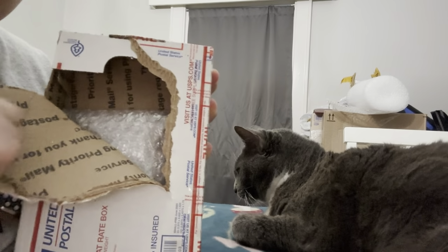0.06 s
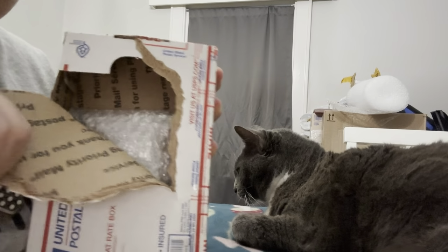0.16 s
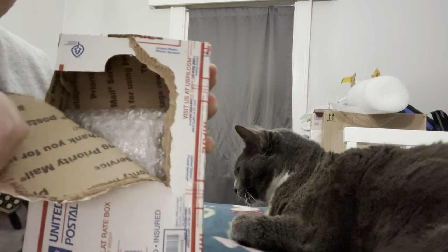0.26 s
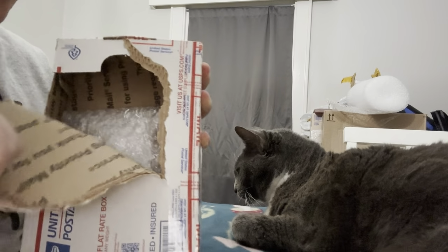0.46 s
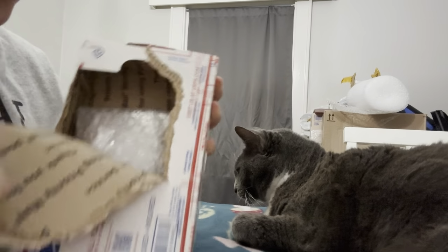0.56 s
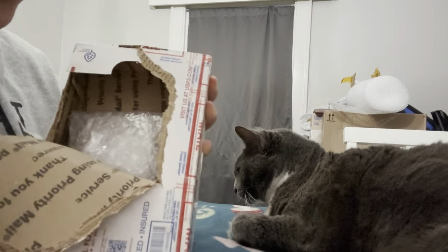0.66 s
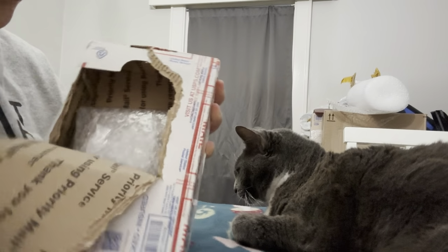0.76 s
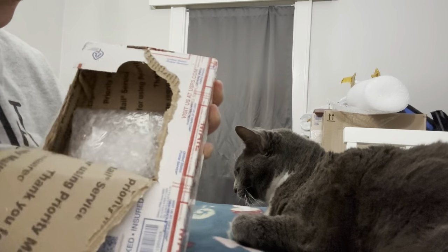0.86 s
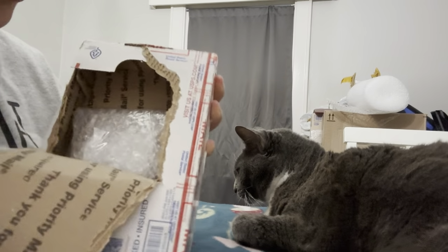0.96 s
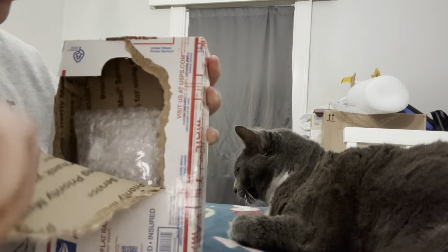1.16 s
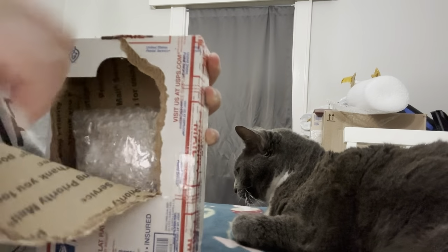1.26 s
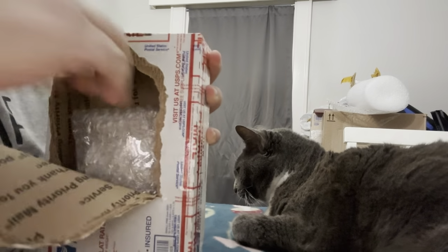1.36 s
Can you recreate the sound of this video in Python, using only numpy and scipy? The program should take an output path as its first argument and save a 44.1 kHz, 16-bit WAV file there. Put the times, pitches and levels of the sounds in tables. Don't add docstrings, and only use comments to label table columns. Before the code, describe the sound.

Cardboard box ripped open by hand in two rough, crackling pulls, then a sharp flap snap

```python
import sys
import numpy as np
from scipy import signal
from scipy.fft import rfft, irfft, next_fast_len
from scipy.io import wavfile
from scipy.ndimage import uniform_filter1d, map_coordinates

SR = 44100
rng = np.random.default_rng(int(sys.argv[2]) if len(sys.argv) > 2 else 0)


def volts_from_decibels(level):
    exponent = np.asarray(level, float) / 20
    return 10 ** exponent


def store_wav(level_fs):
    pcm = np.round(np.clip(np.atleast_2d(level_fs), -1, 1) * 32767)
    wavfile.write(sys.argv[1], SR, pcm.T.astype(np.int16))


N = 61739
TOP_HZ = 15900

# f/Hz, level per Hz/dB
AIR_SPECTRUM = [(30, -6.5), (136, -2), (211, -5), (296, -3), (497, -6.5), (1100, -39.5), (1900, -17.5),
                (2500, -32.5), (15000, -47.5)]
# f/Hz, T60/s
ROOM_DECAY = [(150, 0.25), (1000, 0.13), (12000, 0.063)]
# f/Hz, phase/rad
PORT_LEAD = [(0, 0), (1460, .2), (2500, 1.1), (3500, .6), (4310, 3.8), (5250, 6.5), (6300, 8.2),
             (7200, 9.45), (8200, 10.9), (9600, 12.5), (12300, 12.65), (13500, 14.2), (15000, 15.6),
             (16400, 15.8)]
# f/Hz, share/1
PORT_COHERENCE = [(60, .96), (200, .93), (700, .5), (1500, .8), (4000, .45), (7200, .7), (9000, .9),
                  (10000, .98), (12000, .96)]
# f/Hz, level/dB
PORT_TILT = [(60, -1), (500, 1), (900, 0), (1500, -2.7), (5000, -3), (9000, 0)]

# f/Hz, level per Hz/dB
HANDLING_SPECTRUM = [(30, -48), (70, 0.5), (150, 6), (260, -7), (400, -42)]
# t/s, duration/s, f/Hz, level/dB, relative pitch gain/1
CREAKS = [
    (.12, .042, 1260, -31, .08),
    (.15, .048, 690, -29, .06),
    (.178, .03, 1290, -35, .04),
    (.922, .06, 415, -35, .2),
    (.965, .045, 470, -38, -.15),
    (.995, .055, 620, -43, .3),
    (1.035, .05, 400, -41, -.25),
]
# t/s, level/dB, f/Hz, T60/s
THUMPS = [
    (0.357, -22.5, 140.5, 0.097),
    (0.501, -19.5, 82.4, 0.058),
    (0.531, -27, 139, 0.11),
    (0.71, -33, 118, 0.091),
    (1.026, -32.5, 82, 0.16),
]
# t/s, level/dB, f/Hz, T60/s
SNAP_MODES = [
    (1.1572, -13, 1890, 0.0093),
    (1.1604, -15, 1720, 0.013),
    (1.161, -19, 1117, 0.034),
    (1.162, -11, 922, 0.014),
    (1.161, -13.5, 4200, 0.0064),
    (1.164, -29, 393, 0.074),
    (1.164, -16.5, 146, 0.022),
]
# t/s, level/dB
SNAP_CRACKS = [
    (1.1572, -34),
    (1.1608, -24),
]

# t/s, level/dB
TICKS = [
    (.0384, -44),
    (.8004, -35),
    (.8125, -22),
    (.8254, -38),
    (.845, -33),
    (.8604, -41),
    (1.0271, -44),
]
# f/Hz, level per Hz/dB
TICK_SPECTRUM = [(1500, -4.5), (3500, -14.5), (9000, -12), (14000, -3.5), (16800, -1.5)]
# t/s, level/dB
ZIPS = [(0.162, -61), (0.174, -49), (0.189, -42), (0.198, -41.5), (0.201, -43), (.212, -41), (.222, -35),
        (.2285, -32), (.238, -37), (0.2445, -32.5), (0.2524, -29.5), (.5665, -48), (0.5765, -39.5),
        (.586, -46), (.602, -40), (0.606, -23.5), (0.62, -33), (0.625, -25.5), (.639, -28.5)]
# f/Hz, level per Hz/dB
ZIP_SPECTRUM = [(3000, 2), (6500, -20), (8500, 2), (12500, 0.5), (15500, -3)]

# f/Hz, bandwidth/Hz, level/dB
PANEL_MODES = [(305.3, 21, -2.5), (426, 140, 0), (805, 302, 0.5), (1420, 460, -2), (1823, 294, 0),
               (2115, 264, -4), (2574, 260, -4.5)]
# f/Hz, level per Hz/dB
FIBRE_SPECTRUM = [(1200, -8), (2300, -4), (4000, 1.5), (6000, -4), (9500, -4.5), (12000, -4.5),
                  (14200, -3.5), (15900, -7.5)]
# t/s, force level/dB, tearing over force/dB
GRIP = [
    (0, -52.5, -0.5),
    (0.04, -41.5, -4.5),
    (.09, -41, -4),
    (0.112, -34.5, -12),
    (0.156, -32.5, -17),
]
# t/s, force level/dB, tearing over force/dB
FIRST_PULL = [
    (0.189, -35.5, -7),
    (.26, -31, -6.5),
    (.34, -33.5, -5.5),
    (.4, -29, -5),
    (0.436, -27.5, -6),
    (0.444, -24, -2),
    (.5, -21.5, -3),
    (0.528, -26.5, 2.5),
    (0.561, -39, -5),
]
# t/s, force level/dB, tearing over force/dB
SECOND_PULL = [
    (.595, -37.5, -4.5),
    (0.608, -43.5, 2.5),
    (.665, -26, -2),
    (.7, -31.5, 2),
    (0.759, -27, -5),
    (0.799, -42.5, 1),
    (0.876, -58, -1.5),
]
# t/s, force level/dB, tearing over force/dB
RUB = [
    (.92, -61.5, 2.5),
    (.95, -52.5, -12),
    (1.008, -46, -13),
    (1.042, -42, -4),
    (1.131, -51.5, -6.5),
    (1.19, -56.5, 0),
    (1.24, -54.5, -11),
    (1.31, -59.5, -14),
    (1.4, -58, -39),
]
# t/s, peak level/dB, crack over peak/dB
JERKS = [(.242, -20, -8), (.253, -11, -28), (0.278, -19.5, -7), (0.312, -14, -12.5), (.352, -10, -8.5),
         (0.393, -17.5, -3.5), (0.403, -20, -8), (0.44, -13, -8), (0.451, -13.5, -9), (0.479, -9, 0),
         (0.493, -13, -3.5), (0.498, -13, -10), (0.505, -3.5, -14), (0.518, -6.5, -2.5), (0.601, -20.5, -5),
         (0.627, -19, -6.5), (0.653, -16.5, -4), (0.705, -10.5, -2), (.716, -16.5, -6), (0.738, -15, 0.5),
         (.756, -11, -15), (.774, -17, -6)]
# peak t/s, level/dB, f/Hz
PANEL_RINGS = [(.233, -28, 775), (.2345, -33, 424), (.244, -25, 782), (.2454, -25.5, 412),
               (.254, -24.5, 678), (.2684, -22.5, 910), (.2724, -24, 1540), (.2744, -28, 358),
               (.28, -25, 1203), (.281, -21, 1690), (.3173, -24.5, 890), (.3552, -18, 1668),
               (.3567, -17.5, 990), (.3622, -22.5, 466), (.3702, -25.5, 870), (.388, -19.5, 857),
               (.3966, -18.5, 1023), (.3966, -20, 1680), (.406, -20.5, 973), (.4235, -27.5, 1006),
               (.442, -12, 963), (.453, -20, 896), (.455, -19, 1975), (.4644, -12, 838),
               (.4664, -23.5, 504), (.474, -19.5, 760), (.48, -9, 2000), (.4804, -13.5, 855),
               (.4894, -13.5, 438), (.4924, -12.5, 1790), (.4944, -16, 906), (.495, -20, 446),
               (.5004, -16.5, 1684), (.5078, -13.5, 1663), (.5108, -15, 430), (.5123, -21.5, 865),
               (.5198, -16, 1830), (.5218, -14.5, 450),
               (.6056, -35.5, 850), (0.6084, -26, 1470), (0.6197, -28, 1400), (0.629, -22.5, 1424),
                (.657, -22.5, 813), (0.659, -19.5, 1421), (.6635, -24.5, 525), (0.6819, -24.5, 530),
                (.6844, -24.5, 1236), (0.6982, -24.5, 1360), (0.7089, -17.5, 858), (0.712, -16, 418),
                (0.716, -17.5, 1263), (.72, -26.5, 983), (.7413, -37.5, 577), (0.7443, -36, 1330),
                (0.745, -23.5, 996), (.7508, -24.5, 954), (.7508, -21, 613), (0.7591, -21, 1394),
                (0.7748, -26.5, 1670), (0.7757, -23.5, 1116), (0.7829, -25.5, 987), (0.816, -34, 980)]


def unit(x):
    return x / np.sqrt(np.mean(x ** 2) + 1e-20)


def noise():
    return rng.standard_normal(N)


def along(points, hz):
    f, value = np.transpose(points)
    return np.interp(np.log(hz + 1), np.log(f + 1), value)


def wobble(rate):
    return map_coordinates(rng.standard_normal(size=1024), [np.arange(N) * rate / SR])


def filtered(x, response):
    m = next_fast_len(N + SR // 4)
    hz = np.fft.rfftfreq(m, 1 / SR)
    return irfft(rfft(x, m) * response(hz), m)[..., :N]


def coloured(x, spectrum, top_hz=SR):
    return filtered(x, lambda hz: volts_from_decibels(along(spectrum, hz)) * (hz < top_hz))


def patchy(x, depth_db):
    z = signal.stft(x, nperseg=256)[2]
    field = uniform_filter1d(rng.standard_normal(z.shape), size=3, axis=0)
    field = uniform_filter1d(field, size=8, axis=1)
    return signal.istft(z * volts_from_decibels(depth_db * unit(field)), nperseg=256)[1][:N]


def event_time():
    return np.arange(SR // 5) / SR


def decay_db(t, hold_s, t60):
    return -60 * np.maximum(t - hold_s, 0) / t60


def add(track, s, sound):
    k = round(s * SR)
    track[k:k + len(sound)] += sound[:len(track) - k]


def air():
    hiss = unit(patchy(coloured(noise(), AIR_SPECTRUM, TOP_HZ), depth_db=1.5))
    return volts_from_decibels(-46 + wobble(20.5)) * hiss


def room(x):
    hz, t, z = signal.stft(rng.standard_normal(SR // 4), SR, nperseg=256)
    fading = volts_from_decibels(-60 * t / along(ROOM_DECAY, hz)[:, None])
    tail = signal.istft(z * fading, SR, nperseg=256)[1]
    delayed = np.pad(x, (150, 0))
    return signal.fftconvolve(delayed, tail / np.linalg.norm(tail))[:N]


def scattered(x):
    z = signal.stft(x, nperseg=128)[2]
    random_phase = np.exp(2j * np.pi * rng.random(z.shape))
    return 1.3 * signal.istft(z * random_phase, nperseg=128)[1][:N]


def ports(x, other):
    def shares(hz):
        angle = np.arccos(np.clip(along(PORT_COHERENCE, hz), -1, 1)) / 2
        return np.array([np.cos(angle), np.sin(angle)])

    f, lead = np.transpose(PORT_LEAD)
    sign = np.array([[.5], [-.5]])

    def difference(hz):
        return volts_from_decibels(sign * along(PORT_TILT, hz)) * np.exp(1j * sign * np.interp(hz, f, lead))

    mid, side = filtered(np.array([x, other]), shares)
    return filtered(np.array([mid + side, mid - side]), difference)


def pull_levels():
    s, force_db, over_db = np.transpose(GRIP + FIRST_PULL + SECOND_PULL + RUB)
    t = np.arange(N) / SR
    return np.interp(t, s, force_db), np.interp(t, s, force_db + over_db)


def handling(force_db):
    shift = unit(coloured(noise(), HANDLING_SPECTRUM))
    return volts_from_decibels(-47.5 + 0.34 * (force_db + 30) + wobble(11.0)) * shift


def creaks():
    out = np.zeros(N)
    for s, length, hz, db, rise in CREAKS:
        n = round(length * SR)
        rate = hz * (1 + rise * np.arange(n) / n)
        scatter = .045 * rng.standard_normal(n)
        phase = np.cumsum(2 * np.pi * rate / SR + scatter)
        tone = np.sin(phase) + volts_from_decibels(-18) * np.sin(2 * phase) + volts_from_decibels(-12) * np.sin(3 * phase)
        roughness = 1 + .4 * np.tanh(wobble(150)[:n])
        add(out, s, volts_from_decibels(db) * np.hanning(n) ** .4 * roughness * tone)
    dull_hz = 1600
    return filtered(out, lambda hz: 1 / np.hypot(1, (hz / dull_hz) ** 3))


def struck_modes(modes):
    t = event_time()
    out = np.zeros(N)
    for s, db, hz, t60 in modes:
        onset = 1 - np.exp(-t * hz / 0.23)
        add(out, s, volts_from_decibels(db - 60 * t / t60) * onset * np.sin(2 * np.pi * hz * t))
    return out


def bursts(events, hold_s, t60):
    t = event_time()
    out = np.zeros(N)
    for s, db in events:
        add(out, s, volts_from_decibels(db + decay_db(t, hold_s, t60)))
    return out


def thumps():
    return struck_modes(THUMPS)


def snap():
    cracks = bursts(SNAP_CRACKS, hold_s=.001, t60=.005)
    return struck_modes(SNAP_MODES) + cracks * unit(coloured(noise(), TICK_SPECTRUM))


def single_fibres():
    ticks = bursts(TICKS, hold_s=.003, t60=.006)
    zips = bursts(ZIPS, hold_s=.001, t60=0.0049)
    bright = unit(coloured(noise(), TICK_SPECTRUM))
    thin = unit(coloured(noise(), ZIP_SPECTRUM, TOP_HZ))
    return ticks * bright + zips * thin


def fibre(x):
    return coloured(x, FIBRE_SPECTRUM, TOP_HZ)


def panels(x):
    def box(f):
        modes = 0
        for k, (centre, width, db) in enumerate(PANEL_MODES):
            damping = 1j * f * width
            modes = modes + (-1) ** k * volts_from_decibels(db) * damping / (centre * centre - f * f + damping)
        return modes / (1 + 1j * (f / 2140) ** 3)

    return unit(filtered(x, box))


def slips(per_s, spread_db, hiss):
    chance, size = rng.random((2, N))
    height = volts_from_decibels(-spread_db * np.log(size + 1e-9))
    breaks = (chance < per_s / SR) * height * rng.choice([-1, 1], N)
    return unit(unit(breaks) + hiss * noise())


def tearing(force_db, tear_db):
    clump_db = 1.6 * wobble(120)
    walls = unit(patchy(panels(slips(2000, 1.5, hiss=.7)), depth_db=2.5))
    fizz = unit(patchy(fibre(slips(6000, 2.2, hiss=0.98)), depth_db=1.5))
    wall_gain = volts_from_decibels(force_db - 0.5 + clump_db)
    fizz_gain = volts_from_decibels(tear_db + 1 + 1.2 * clump_db + 1.02 * wobble(400))
    return wall_gain * walls + fizz_gain * fizz


def flute_rings():
    rise_s, t60 = 0.003037, 0.028
    t = event_time()
    rise = np.sin(np.pi / 2 * np.minimum(t / rise_s, 1)) ** 2
    swell = rise * volts_from_decibels(decay_db(t, rise_s, t60))
    out = np.zeros(N)
    for s, db, hz in PANEL_RINGS:
        drift = np.cumsum(.04 * rng.standard_normal(len(t)))
        ring = swell * np.sin(2 * np.pi * hz * t + drift)
        add(out, s - rise_s, volts_from_decibels(db + 0.62) * ring)
    return out


def flute_cracks():
    hold_s, rattle_t60, crack_t60 = 0.0023, 0.035, 0.029
    t = event_time()
    rattle_shape = (1 - np.exp(-t / 0.00069)) * volts_from_decibels(decay_db(t, hold_s, rattle_t60))
    crack_shape = (1 - np.exp(-t / 0.0014)) * volts_from_decibels(decay_db(t, hold_s, crack_t60))
    rattle, crack = np.zeros((2, N))
    for s, db, over_db in JERKS:
        add(rattle, s, volts_from_decibels(db - 12.5) * rattle_shape)
        add(crack, s, volts_from_decibels(db + over_db - 4) * crack_shape)
    return rattle * panels(noise()) + crack * unit(fibre(noise()))


def scene():
    force_db, tear_db = pull_levels()
    creak = creaks()
    box = handling(force_db) + creak + thumps() + snap() + single_fibres()
    box = box + tearing(force_db, tear_db) + flute_rings() + flute_cracks()
    room_gain = volts_from_decibels(-14)
    common = box + room_gain * room(box) + air()
    wide_creak = volts_from_decibels(4.5) * creak
    diffuse = scattered(box) + wide_creak + room_gain * room(box) + air()
    return ports(common, diffuse)


def band_limit(x):
    return signal.sosfilt(signal.butter(12, 16810, fs=SR, output="sos"), x)


def record(dry):
    mix = filtered(dry, lambda hz: (hz < 16800) * hz / np.hypot(hz, 50))
    return band_limit(mix)


dry = scene()
out = record(dry)
store_wav(out)
```